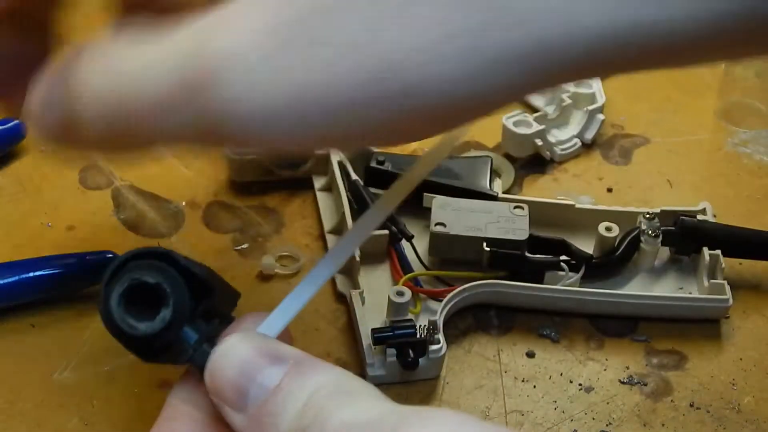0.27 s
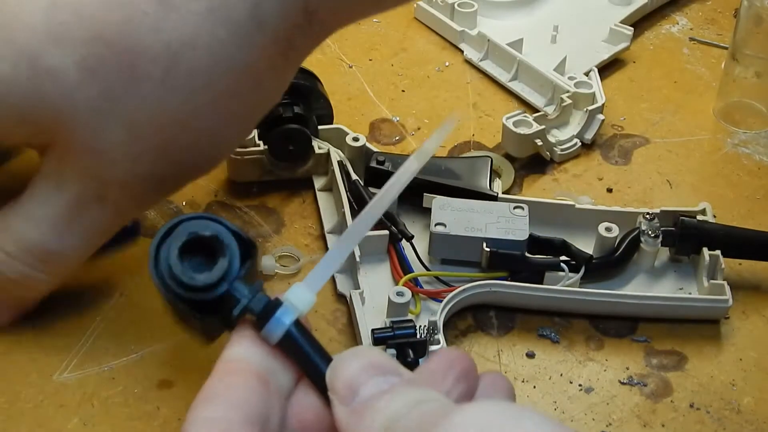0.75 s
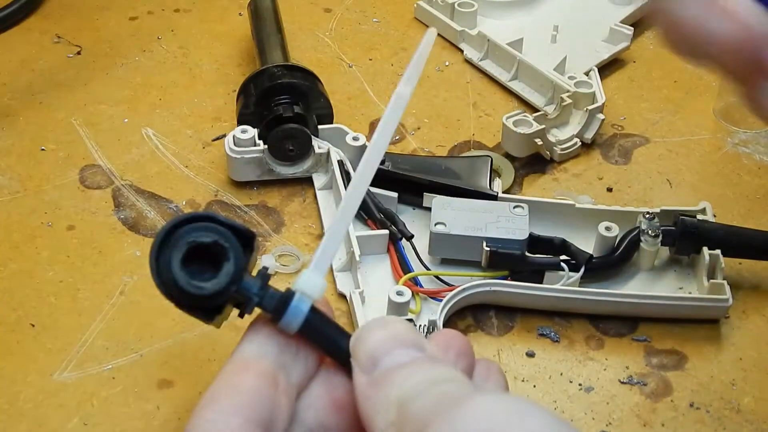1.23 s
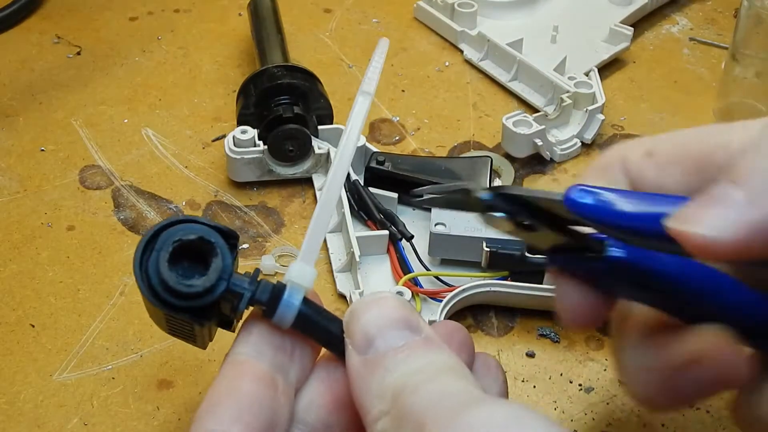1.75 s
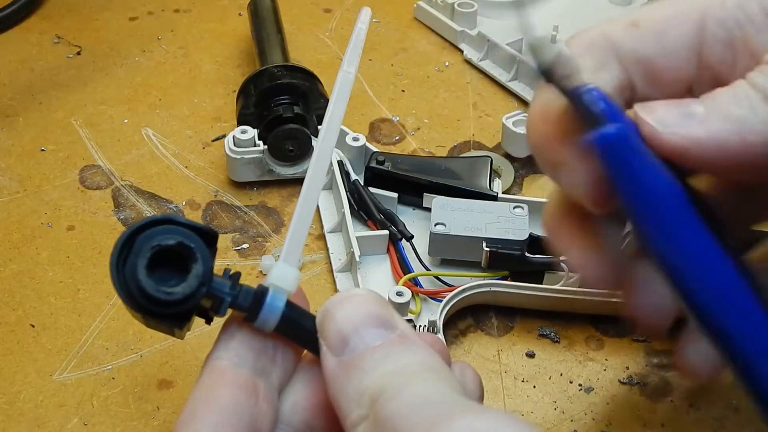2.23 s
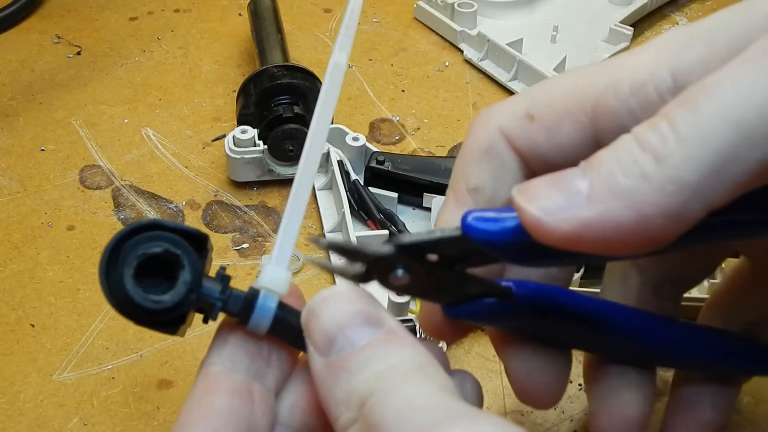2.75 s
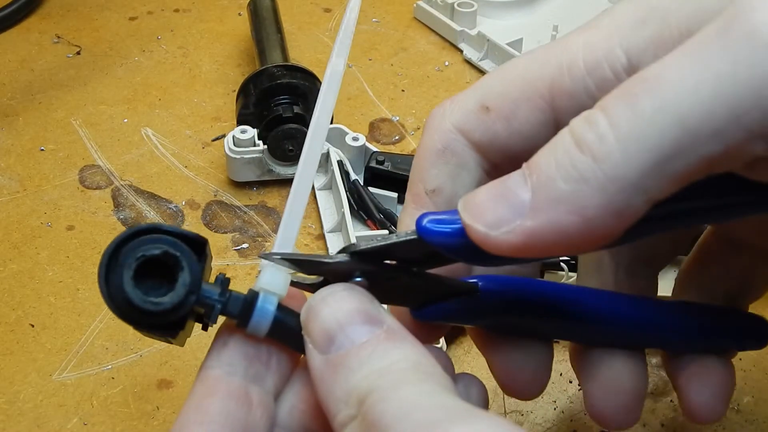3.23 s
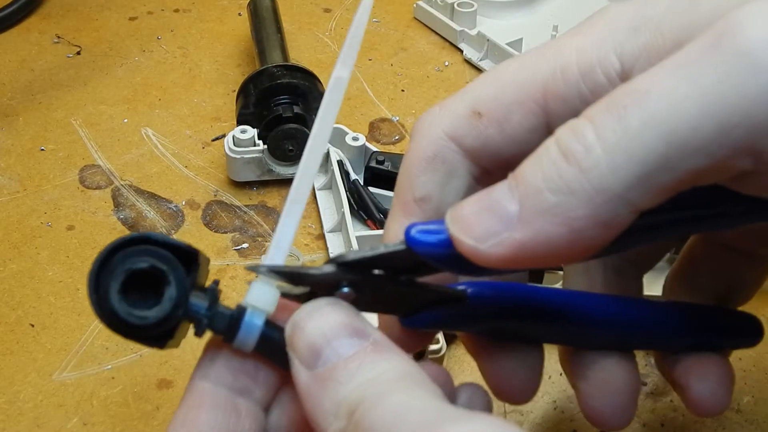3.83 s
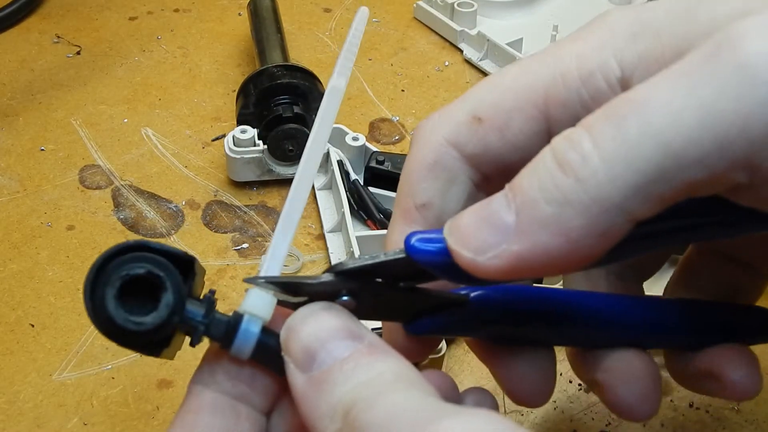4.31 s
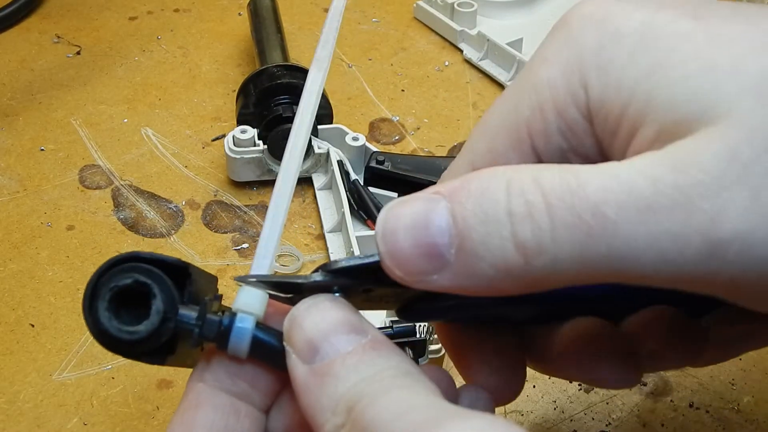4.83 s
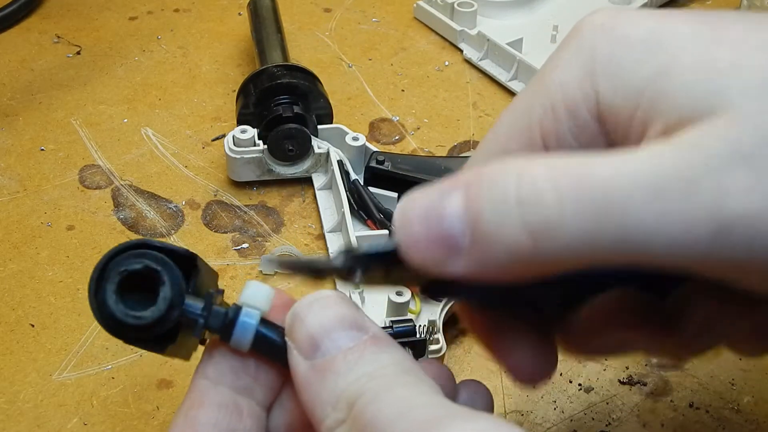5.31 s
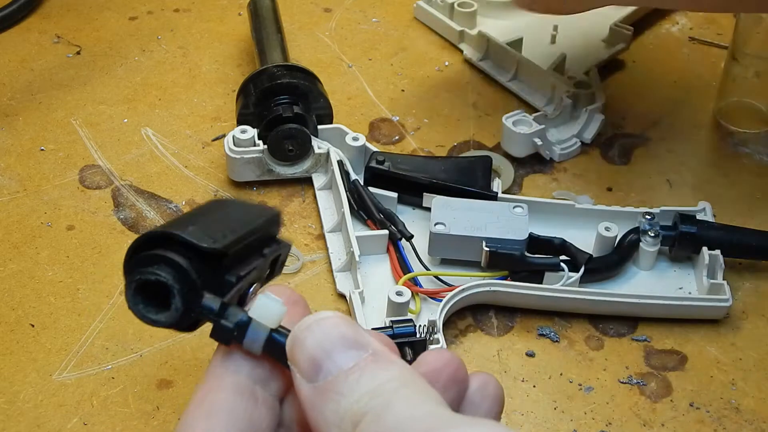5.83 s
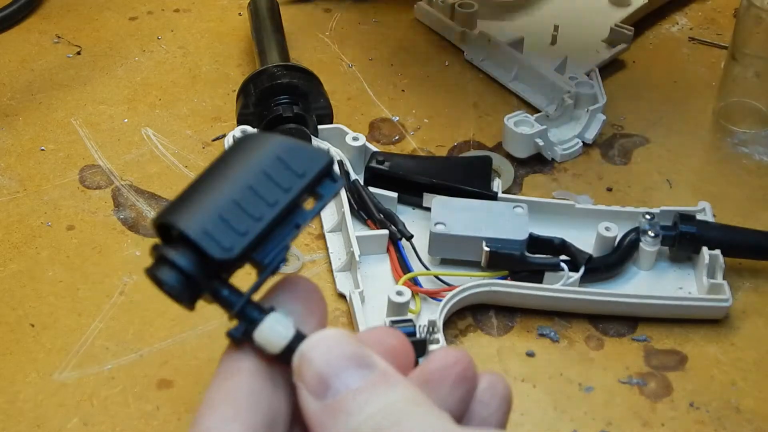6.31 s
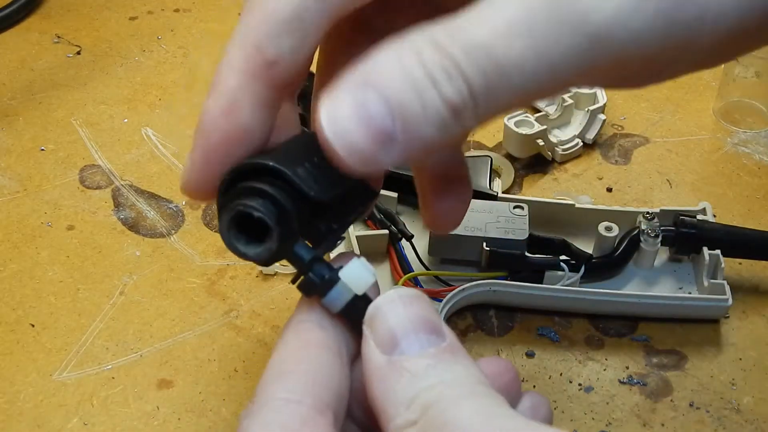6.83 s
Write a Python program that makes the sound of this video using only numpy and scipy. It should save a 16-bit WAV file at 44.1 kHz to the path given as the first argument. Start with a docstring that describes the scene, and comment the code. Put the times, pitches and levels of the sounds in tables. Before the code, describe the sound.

Plastic parts knock softly, a cable tie is cut with one loud snap, and hard plastic shells clatter on a bench.

```python
"""A workbench in a quiet room that hums and hisses, heard from close by. Pliers are lifted and put down
among plastic housings: each impact excites damped modes of the housings and the bench top. Small parts
tick, a sleeve rustles, plastic scrapes and a loose shell rocks. The cutter snips a nylon tie with a
broadband crack, the cut end skitters away, and housings clatter and grind together. Nearby walls return
a short echo, and a limiter ducks the level after the snip."""
import sys
import numpy as np
from scipy import signal
from scipy.fft import rfft, irfft, next_fast_len
from scipy.io import wavfile
from scipy.ndimage import uniform_filter1d, minimum_filter1d

SR = 44100
rng = np.random.default_rng(int(sys.argv[2]) if len(sys.argv) > 2 else 0)


def store_wav(level_fs):
    """Save 16-bit WAV to argv[1]."""
    pcm = np.round(np.clip(np.atleast_2d(level_fs), -1, 1) * 32767)
    wavfile.write(sys.argv[1], SR, pcm.T.astype(np.int16))


N = 311346


def undb(db):
    """Amplitude ratio of a level in decibels."""
    return 10 ** (np.asarray(db) / 20)


def unit_rms(x):
    """Normalisation to an rms of 1."""
    return x / np.sqrt(np.mean(x ** 2))


def on_log(hz, points):
    """Interpolation of (Hz, value) points on a log-frequency axis."""
    p = np.array(points, float)
    return np.interp(np.log(np.maximum(hz, 1)), np.log(p[:, 0]), p[:, 1])


def drift(per_s):
    """Slow random modulation: held values, smoothed twice."""
    hold = int(SR / per_s)
    steps = np.repeat(rng.standard_normal(N // hold + 1), hold)
    return 0.15 * uniform_filter1d(uniform_filter1d(steps, hold), hold)[:N]


def noise(size, spectrum, coherence):
    """Partly coherent stereo noise of rms 1, shaped by (Hz, dB) and (Hz, coherence 0-1) points."""
    fast = next_fast_len(size)
    hz = np.fft.rfftfreq(fast, 1 / SR)
    alike = np.clip(on_log(hz, coherence), 0, 1)
    mid, side = rfft(rng.standard_normal((2, fast))) * undb(on_log(hz, spectrum))
    mid, side = mid * np.sqrt(1 + alike), side * np.sqrt(1 - alike)
    return unit_rms(irfft(np.array([mid + side, mid - side]), fast)[:, :size])


def add(out, sound, s):
    """Superposition of a short stereo sound on out at s seconds."""
    i = int(s * SR)
    n = min(sound.shape[1], out.shape[1] - i)
    out[:, i:i + n] += sound[:, :n]


def ring(modes, contact_s, chatter_s, scatter_db=1.0, apart_hz=3500, detune=0.028, rise_cycles=0.76):
    """Modal response: damped sinusoids convolved with a few quick force pulses; peak 1."""
    hz, db, t60 = np.transpose(modes)[:, :, None]
    t = np.arange(int(t60.max() * SR)) / SR
    size, stray, apart = rng.standard_normal((3, len(modes), 1))
    # shorter waves differ more in phase between left and right
    phase = apart * np.minimum(hz / apart_hz, 1.5) * np.array([1, -1])[:, None, None]
    envelope = (1 - np.exp(-t * hz / rise_cycles)) * undb(-60 * t / t60)
    waves = envelope * np.sin(2 * np.pi * hz * (1 + detune * stray) * t + phase)
    response = (undb(db + scatter_db * size) * waves).sum(axis=1)
    when, strength = rng.random((2, 4))
    contacts = np.zeros(int(chatter_s * 3 * SR) + 2)
    contacts[0] = 1
    contacts[1 + (when * (len(contacts) - 2)).astype(int)] = (2.35 * strength - .8) * np.exp(-1.5 * when)
    force = np.convolve(contacts, np.hanning(int(contact_s * SR) + 3))
    sound = signal.fftconvolve(response, force[None])
    return sound / np.abs(sound).max()


# Spectra of the room's noise. Each row: frequency in Hz, spectral level in dB.
HUM_SPECTRUM = [(15, -54), (25, -18.5), (102, -1), (192, -10.5), (228, -16), (313, -17.5), (404, -5),
                (468, -11), (499, -12), (532, -15.5), (1050, -19.5), (1220, -16), (1330, -19.5),
                (1900, -23), (4000, -36), (5200, -49), (8800, -120)]
HISS_SPECTRUM = [(1180, -25), (2000, -4), (2880, -0.5), (5440, -7), (6880, -10), (7440, -11.5),
                 (11600, -7.5), (12500, 0), (13300, -8), (16000, -16.5)]
# Narrow bands in the hum. Each row: centre in Hz, width in Hz, level relative to the hum in dB.
HUM_BANDS = [(1215, 28, -15)]
# The room's sound field. Each row: frequency in Hz, left-right coherence from 0 to 1.
ROOM_COHERENCE = [(60, 1), (130, 0.8), (290, 0.67), (640, 0.4), (1410, 0.4), (3100, 0), (6820, 0),
                  (15000, 0.01)]


def room_tone(line_hz=500, swell_s=2.29, swell_hz=368):
    """Ambient noise, most coherent in the bass: a hum with a pure tone and one swell, under hiss."""
    t = np.arange(N) / SR
    hum = noise(N, HUM_SPECTRUM + [(6000, -40.0)], ROOM_COHERENCE) * undb(0.66 * drift(11))
    for hz, width, db in HUM_BANDS:
        band = [(hz - 2 * width, -60), (hz - width / 2, 0), (hz + width / 2, 0), (hz + 2 * width, -60)]
        hum += undb(db) * noise(N, band, ROOM_COHERENCE)
    hum += undb(-7 + .8 * drift(1.5)) * np.sin(2 * np.pi * line_hz * t)
    swell_band = [(swell_hz / 2, -20), (swell_hz, 0), (2 * swell_hz, -15), (3000, -30), (6000, -80)]
    swell = np.exp(-.5 * ((t - swell_s) / 0.29) ** 2) * noise(N, swell_band, ROOM_COHERENCE)
    hiss = noise(N, HISS_SPECTRUM, ROOM_COHERENCE)
    return undb(-53.5) * hum + undb(-53) * swell + undb(-62.5) * hiss


# Five mode families of housings and bench. Each row: frequency in Hz, level in dB, T60 in seconds.
HOLLOW_MODES = [(408.6, -4, 0.16), (396.4, -0.5, 0.07), (463.2, 2.5, 0.066), (519.5, -3.5, 0.09),
                (344, -6.5, 0.07)]
THUMP_MODES = [(101.5, 12.8, 0.16), (125, 6, 0.04)]
BOARD_MODES = [(158.4, -3.5, 0.12), (194.6, 2, 0.15), (233.8, 1, 0.1), (264.8, 9.5, 0.04)]
HOUSING_MODES = [(651, -0.5, 0.081), (690, -0.5, 0.096), (840, 3.5, 0.061), (894.5, -2, 0.069),
                 (1047, 10, 0.034), (1187, 2, 0.048), (1370, 7.5, 0.025), (1574, -6, 0.055),
                 (1704, -7, 0.086), (1863, -1.5, 0.07), (2120, -12, 0.043), (2157, -9, 0.05),
                 (2320, -16, 0.061)]
EDGE_MODES = [(1935, 5, .022), (2200, 4, .02), (2500, 3, .018), (2790, 3, 0.018), (2990, 4, 0.018),
              (3150, 3, .016), (3330, 4, 0.018), (3660, 3, 0.016), (4130, -2, .013), (4420, -4, .011),
              (4780, -3, .011), (5200, -6, 0.01), (5700, -7, .01), (6200, -6, 0.01), (6900, -8, .009)]
# One entry per family, in that order. The lists give contact time in seconds, chatter time in seconds,
# level scatter in dB, pitch scatter as a fraction, and gain in dB.
FAMILY_CONTACT_S = [0.0011, 0.0038, 0.001, 0.00024, .0001]
FAMILY_CHATTER_S = [0.00611, 0.0034, 0.00504, 0.0065, 0.006]
FAMILY_SCATTER_DB = [3, 1.5, 2.2, 3, 2.5]
FAMILY_DETUNE = [.015, .008, .012, .015, .02]
FAMILY_GAIN_DB = [-0.1, 1.5, 2, -10, -29]
# Contact noise of a knock. Each row: frequency in Hz, spectral level in dB.
SCUFF_SPECTRUM = [(150, -18.5), (450, -8.5), (1000, -3), (2200, -11), (5000, -32.5), (12000, -40.5)]
# Impacts. Each row: start in seconds, blow on a housing in dB, blow on the bench in dB, hardness in dB.
KNOCKS = [(0.0, -52.5, -43, -1), (0.129, -52, -43.5, -8), (0.489, -36, -36, -3), (0.501, -26.5, -26, 4),
          (0.517, -22.5, -36, -21), (0.598, -42.5, -32.5, -7), (0.651, -34, -33, 3), (0.663, -31.5, -41, 0),
          (0.678, -19.5, -26.5, -3), (0.725, -35.5, -30, 2), (0.745, -18.5, -27, -4.5),
          (0.905, -30, -48, 8.5), (2.702, -37.5, -39, 4), (2.972, -70, -40.5, 4), (3.09, -61, -46, 2),
          (4.51, -61, -39, 6), (4.547, -69, -47, 0), (5.135, -46, -35, -4), (5.303, -29, -33.5, 10.5),
          (5.37, -44, -44, -1), (5.418, -40, -44, 3), (5.462, -41, -44, 6), (6.094, -11.5, -11.5, 0),
          (6.125, -23, -17.5, 8), (6.155, -7, -11, 1), (6.166, -9.5, -24, 6), (6.174, -9.5, -17, -16),
          (6.228, -19.5, -17, 2.5), (6.251, -10, -30, 8.5), (6.293, -24, -8.5, 10),
          (6.299, -12.5, -8.5, 14), (6.319, -20, -21, 10), (6.3487, -12, -23.5, 10), (6.38, -27.5, -17, 0),
          (6.445, -16.5, -26.5, 8.5), (6.469, -38, -26, -3), (6.526, -22.5, -23, 5.5),
          (6.571, -29.5, -38.5, 1.5), (6.612, -44, -41.5, -2), (6.89, -55, -46.5, 2)]


def knocks():
    """Impact excitation: each blow rings five mode families and scuffs; harder contacts reach higher."""
    out = np.zeros((2, N))
    families = list(zip((HOLLOW_MODES, THUMP_MODES, BOARD_MODES, HOUSING_MODES, EDGE_MODES),
                        FAMILY_CONTACT_S, FAMILY_CHATTER_S, FAMILY_SCATTER_DB, FAMILY_DETUNE,
                        FAMILY_GAIN_DB))
    t = np.arange(4096) / SR
    scuff_rise_s, scuff_t60_s = 0.00089, 0.12
    fade = (1 - np.exp(-t / scuff_rise_s)) * undb(-60 * t / scuff_t60_s)
    for s, housing_db, bench_db, hard_db in KNOCKS:
        board_db = min(housing_db, bench_db + 4.5)
        levels = housing_db, bench_db, board_db, housing_db + hard_db, housing_db + 2.34 * hard_db
        for db, (modes, contact_s, chatter_s, scatter_db, detune, gain_db) in zip(levels, families):
            add(out, undb(db + gain_db) * ring(modes, contact_s, chatter_s, scatter_db, detune=detune), s)
        tilted = [(hz, db + 0.16 * hard_db * np.log2(hz / 150)) for hz, db in SCUFF_SPECTRUM]
        scuff = fade * noise(len(t), tilted, [(500, 0.85), (8000, 0.27)])
        add(out, undb(housing_db + 0.59 * hard_db - 19.5) * scuff, s)
    # the knocks carry little sound below about 75 Hz
    return signal.sosfilt(signal.butter(4, 74.7, "high", fs=SR, output="sos"), out)


# A hard contact. Each row: frequency in Hz, spectral level in dB.
CRACK_SPECTRUM = [(120, -32.5), (400, -1), (2500, -5), (5000, -6.5), (7500, -4), (10000, -1.5), (13000, -6),
                  (15000, -9), (16000, -14.5)]


def crack(db, tail_db=-2.5, t60=0.11, spectrum=CRACK_SPECTRUM, coherence=.3):
    """A brief contact is broadband: a sharp noise burst, then a hissing tail of tiny rebounds."""
    t = np.arange(6144) / SR
    fade = np.exp(-t / 0.00089) + undb(tail_db - 60 * t / t60)
    return 0.58 * undb(db) * fade * noise(len(t), spectrum, [(300, 0.77), (8000, coherence)])


# Modes of a small part. Each row: frequency in Hz, level in dB, T60 in seconds.
PART_MODES = [(476, 4, 0.017), (954, 10, 0.0064), (1435, 2, 0.02), (1890, -1.5, 0.02), (2110, -12.5, 0.034),
              (3270, -27.5, 0.016)]


def tick(db, ring_db, coherence=.091, pan_db=-2.5, **crack_shape):
    """Transient and free vibration: a crack and the part's short ring, a little to the right."""
    out = crack(0, coherence=coherence, **crack_shape)
    add(out, undb(ring_db + 12) * ring(PART_MODES, .0001, .002, scatter_db=2.0), 0)
    return out * undb(db + np.array([[pan_db], [-pan_db]]) / 2)


# Ticks. Each row: start in seconds, level in dB, ring against its usual share of the crack in dB.
TICKS = [(0.0545, -47, -34), (0.062, -45.5, -35), (0.0981, -41, -30), (0.6704, -39, -13), (1.533, -49, -23),
         (1.7856, -51.5, -24), (2.0054, -46, -12), (2.324, -48, -23), (4.5017, -50.5, -7),
         (5.2395, -49, -21), (5.294, -30, -3), (5.306, -19.5, -14), (5.343, -39, -6), (5.3514, -34, -5.5),
         (5.361, -37.5, -8), (6.6127, -52.5, -5), (6.6546, -52, -23), (6.9363, -40.5, -22)]


def small_parts():
    """Light impacts: small hard parts tick, their modes heavily damped."""
    out = np.zeros((2, N))
    for s, db, ring_db in TICKS:
        add(out, tick(db, ring_db), s)
    return out


def grit(size, spread_db, grains_per_s=900):
    """Irregular friction: a gain that jumps from grain to grain, now and then far up; rms 1."""
    hold = int(SR / grains_per_s)
    grains = undb(spread_db * rng.exponential(size=size // hold + 1))
    return unit_rms(uniform_filter1d(np.repeat(grains, hold), hold)[:size])


# Hand movements. Each row: start in seconds, length in seconds, level in dB.
BRUSHES = [(.07, 0.044, -52), (.3, 0.28, -59.5), (.6, .4, -61.5), (1.0, 0.42, -62.5)]


def rustle(centre_hz=10200, width_hz=14300, fade_s=0.13):
    """Friction noise: skin and sleeve brush past with a fine, patchy treble."""
    t = np.arange(N) / SR
    gates = sum(undb(db) * ((t > s) & (t < s + length)) for s, length, db in BRUSHES)
    envelope = uniform_filter1d(gates, int(fade_s * SR))
    patches = undb(2.5 * unit_rms(drift(14))) * grit(N, spread_db=2.4)
    low, high = centre_hz - width_hz / 2, centre_hz + width_hz / 2
    band = [(low / 2, -25), (low, -6), (centre_hz, 0), (high, -6)]
    return envelope * patches * noise(N, band, [(1000, .2), (9000, 0.091)])


# Short scrapes. Each row: start in seconds, length in seconds, level in dB, band centre in Hz.
SCRAPES = [(.635, .055, -47, 3000), (.645, .045, -52, 11000), (.89, .05, -46, 1600),
           (1.058, .045, -48, 1400), (2.185, .03, -58, 7000), (2.31, .032, -51, 9500),
           (5.078, .05, -43, 7500), (5.112, .036, -18, 4000), (6.27, .036, -39, 5000),
           (6.295, .045, -26, 3500)]


def scrapes():
    """Friction and crushing: plastic slides on plastic and blades bite nylon, in grainy noise bands."""
    out = np.zeros((2, N))
    for s, length, db, hz in SCRAPES:
        n = int(length * SR)
        band = [(hz / 4, -30), (hz / 2, -4), (hz, 0), (hz * 2, -4), (hz * 4, -30)]
        sound = grit(4096, spread_db=1.8) * noise(4096, band, [(500, .8), (8000, .5)])
        add(out, undb(db) * np.hanning(n) * sound[:, :n], s)
    return out


# Modes of a loose shell. Each row: frequency in Hz, level in dB, T60 in seconds.
SHELL_MODES = [(382, -9, .08), (412, -7, .09), (436, 2, .08), (458, -2, .08), (549, 0, .09),
               (855, -10, .07), (905, -12, .07), (1044, -9, .06)]
# Its landings. Each row: start in seconds, blow in dB, hardness in dB.
SHELL_KNOCKS = [(0.819, -32, 1.5), (0.885, -36, 4), (0.9005, -14.5, 0.5), (0.9105, -11.5, -6),
                (0.96, -31, -12), (1.035, -40, -3), (1.045, -34, -3), (1.065, -22.5, 4.5), (1.076, -24, -3),
                (1.128, -36, -12)]


def rocking_shell():
    """Shell resonance: hollow plastic rocks, ringing its own modes and, faintly, the housing's."""
    out = np.zeros((2, N))
    for s, db, hard_db in SHELL_KNOCKS:
        body = ring(SHELL_MODES, .0016, .0004, scatter_db=1.5, detune=0.0055, rise_cycles=1.6)
        upper = ring(HOUSING_MODES, FAMILY_CONTACT_S[3], FAMILY_CHATTER_S[3])
        add(out, undb(db) * body, s)
        add(out, undb(db + hard_db - 14) * upper, s)
    return out


# Modes of the pliers. Each row: frequency in Hz, level in dB, T60 in seconds.
STEEL_MODES = [(550, -2, .02), (1580, 1, .02), (1800, 3, .03), (1955, 5, .045), (2290, 0, .035),
               (3310, -5, .04), (5030, 4, .025), (5930, 3, .03), (6600, -1, .03), (7180, 4, .035),
               (8600, -1, .04), (10220, -3, .03)]
# Joint clicks. Each row: start in seconds, crack in dB, ring in dB, contact time in seconds.
JOINT_CLICKS = [(1.3348, -28, -28, .00006), (1.3367, -30.5, -29, .00006), (2.0848, -40, -37, .0003),
                (2.091, -56, -43, .0004)]


def pliers():
    """Contact time sets bandwidth: the shorter a click of the joint, the brighter the steel rings."""
    out = np.zeros((2, N))
    for s, crack_db, ring_db, contact_s in JOINT_CLICKS:
        add(out, crack(crack_db, tail_db=-7, t60=.075), s)
        add(out, undb(ring_db) * ring(STEEL_MODES, contact_s, .0001, apart_hz=8900, detune=0.0027), s)
    return out


# The nylon parting. Each row: frequency in Hz, spectral level in dB.
SNIP_SPECTRUM = [(120, -37), (450, -2), (1500, -5), (3500, -6), (6000, -4), (8500, -2), (10200, 0.5),
                 (13000, -4), (16000, -14)]


def snip(start_s=5.1165):
    """Sudden release of stress: the tie parts under the cutter with one loud crack."""
    out = np.zeros((2, N))
    snap = tick(8.5, ring_db=-29, coherence=.6, tail_db=-9, t60=0.071, spectrum=SNIP_SPECTRUM)
    add(out, snap, start_s)
    return out


# Modes of the tie's cut end. Each row: frequency in Hz, level in dB, T60 in seconds.
CUT_END_MODES = [(950, 1, .018), (1500, -5, .016), (1750, 0, .02), (1980, 2, .022), (2220, -4, .018)]
# Its landings. Each row: start in seconds, ring in dB, crack in dB.
BOUNCES = [(5.419, -44, -50), (5.464, -43, -60), (5.5043, -30.5, -47.5), (5.549, -31.5, -58),
           (5.5671, -28, -45.5), (5.6094, -47, -60)]


def cut_end():
    """Elastic rebound: the cut end skitters over the bench, cracking and ringing at each landing."""
    out = np.zeros((2, N))
    for s, ring_db, crack_db in BOUNCES:
        add(out, crack(crack_db), s)
        add(out, undb(ring_db) * ring(CUT_END_MODES, .0001, .0002, scatter_db=1.2), s)
    return out


# Housing striking housing. Each row: frequency in Hz, spectral level in dB.
CLATTER_SPECTRUM = [(500, -16), (2000, -3.5), (4800, -5), (7000, -12), (10500, -14), (12500, -24),
                    (16000, -42)]
# Collisions. Each row: start in seconds, level in dB.
COLLISIONS = [(6.092, -27.5), (6.1247, -44), (6.1529, -27), (6.1594, -30), (6.1640, -25.5), (6.1806, -33),
              (6.249, -39), (6.2968, -18), (6.3002, -17), (6.3070, -23), (6.3203, -19), (6.329, -34),
              (6.3538, -36)]


def clatter():
    """Impact noise: housings collide in a cluster of broadband cracks."""
    out = np.zeros((2, N))
    for s, db in COLLISIONS:
        add(out, crack(db, tail_db=-9, t60=.065, spectrum=CLATTER_SPECTRUM), s)
    return out


def grinding_edges(start_s=6.2975, length_s=.037, hits=16):
    """Repeated excitation: the edges of two housings catch many times in a quick, fading grind."""
    out = np.zeros((2, N))
    modes = EDGE_MODES + [(4780, 8, .018)]  # the grinding edge adds one mode of its own
    for k, (late, weakness) in enumerate(rng.random((hits, 2))):
        along = (k + late) / hits
        hit = ring(modes, FAMILY_CONTACT_S[4], .001, scatter_db=4, detune=.03)
        add(out, undb(-16 - 3 * along - 5.5 * weakness) * hit, start_s + length_s * along)
    return out


def echo(direct, t60=0.068):
    """Early reflections: nearby walls and clutter return a short, dull echo, different on each side."""
    t = np.arange(int(.3 * SR)) / SR
    spectrum = [(150, -9), (500, 4.5), (3000, 4.5), (12000, -21.0)]
    response = noise(len(t), spectrum, ROOM_COHERENCE) * undb(-60 * t / t60) * (t > .003)
    response /= np.sqrt((response ** 2).sum() / 2)
    return signal.fftconvolve(direct.mean(axis=0)[None], response)[:, :N]


def scene():
    """Superposition of the direct sounds from the bench, their echo, the room tone and the rustle."""
    direct = knocks() + rocking_shell() + grinding_edges() + snip() + small_parts()
    direct += clatter() + pliers() + cut_end() + scrapes()
    return direct + undb(-17) * echo(direct) + room_tone() + rustle()


def record(dry):
    """Peak limiting: the gain ducks at once under peaks and recovers slowly; a low-pass cuts the top."""
    limit_db, recover_db_per_s, look_ahead_s, top_hz = -5.5, 18, 0.0013, 15750
    ahead = int(look_ahead_s * SR)
    over_db = np.maximum(20 * np.log10(np.abs(dry).max(axis=0) + 1e-9) - limit_db, 0)
    recovery = recover_db_per_s * np.arange(N) / SR
    duck_db = np.maximum.accumulate(over_db + recovery) - recovery
    duck_db = uniform_filter1d(-minimum_filter1d(-duck_db, 2 * ahead), ahead)
    balance = undb([[-.4], [.4]])  # the left channel is a little quieter
    low_pass = signal.ellip(10, .2, 80, top_hz, fs=SR, output="sos")
    return signal.sosfilt(low_pass, balance * undb(-duck_db) * dry)


dry = scene()
out = record(dry)
store_wav(out)
```